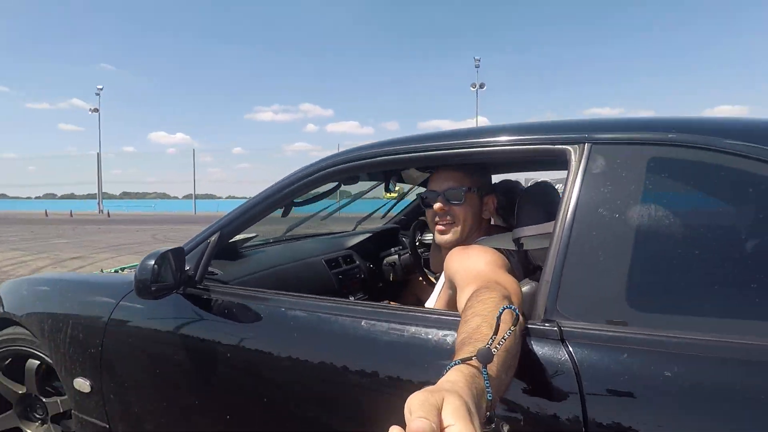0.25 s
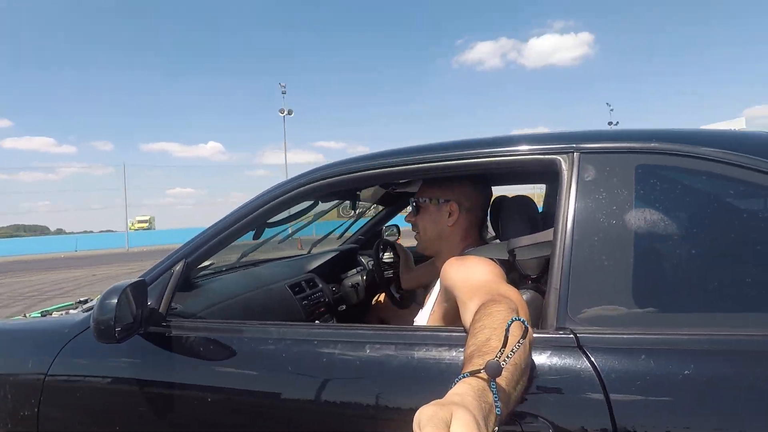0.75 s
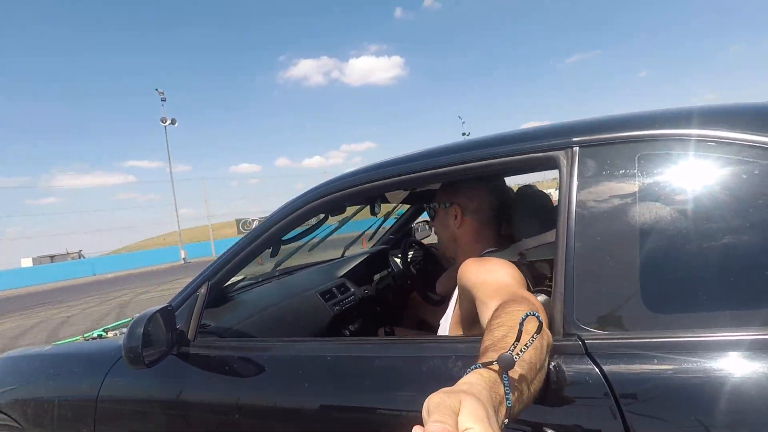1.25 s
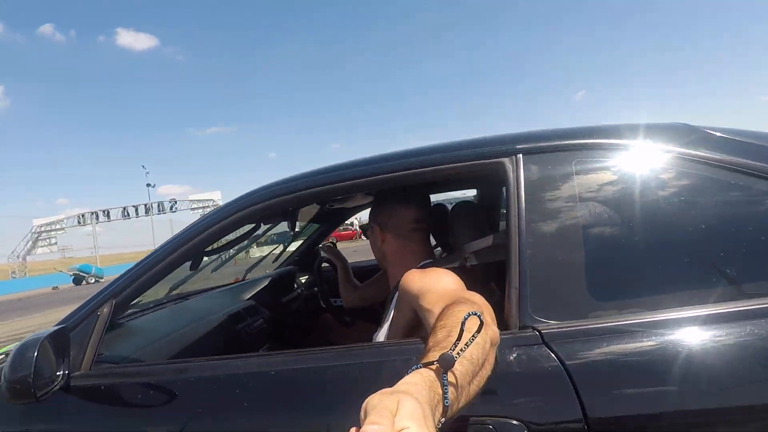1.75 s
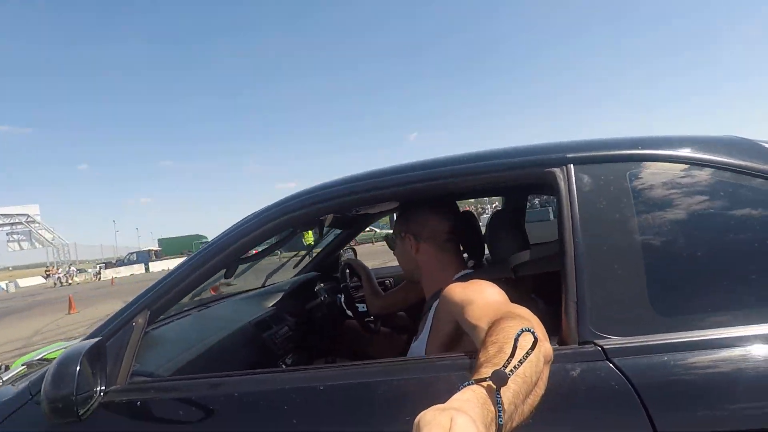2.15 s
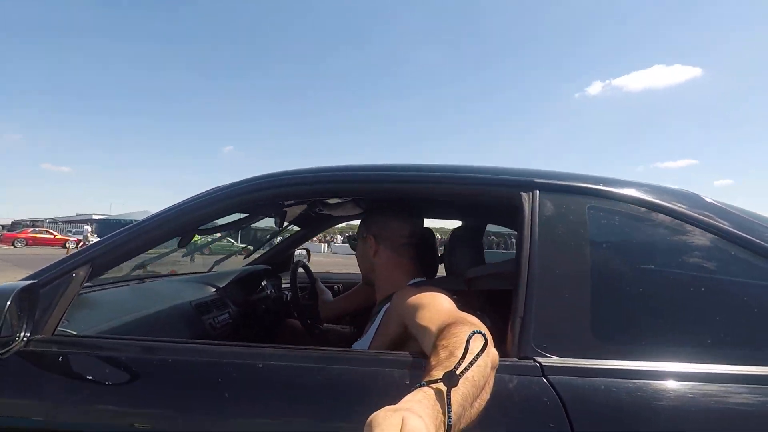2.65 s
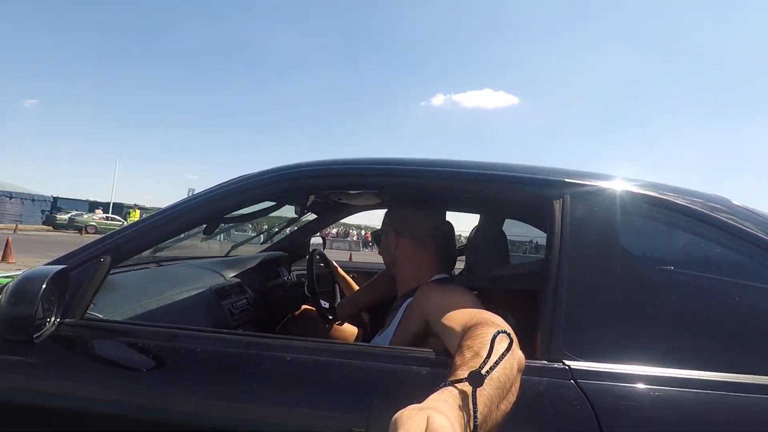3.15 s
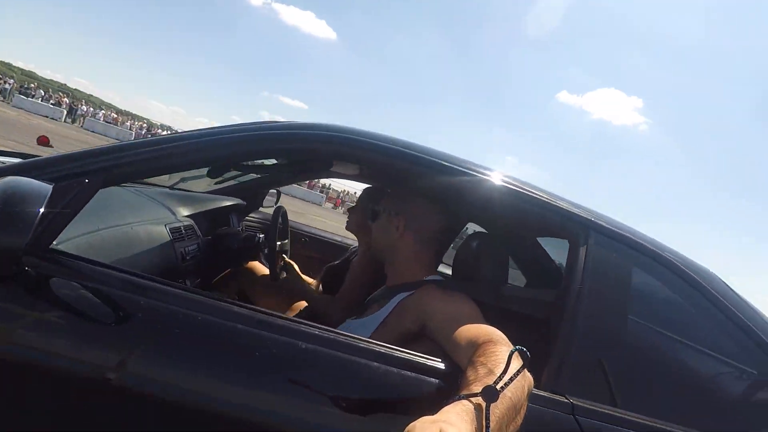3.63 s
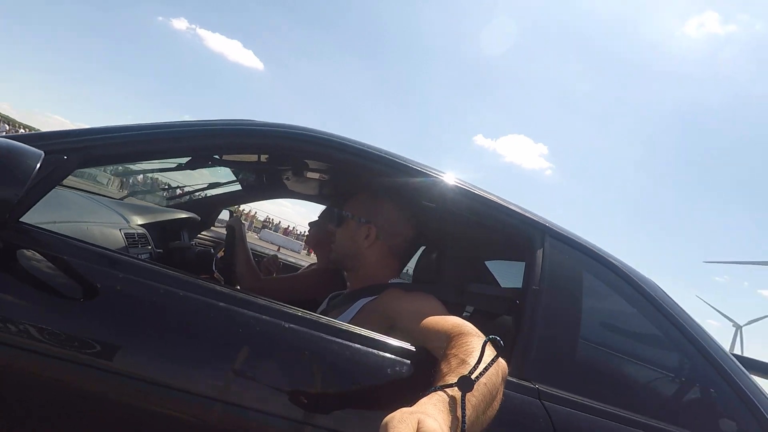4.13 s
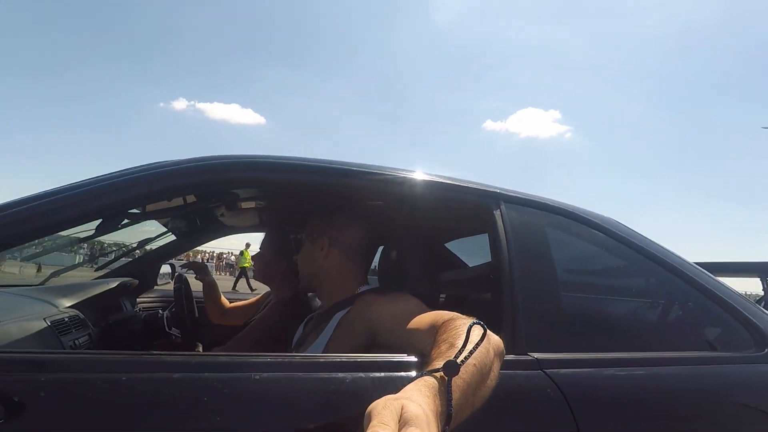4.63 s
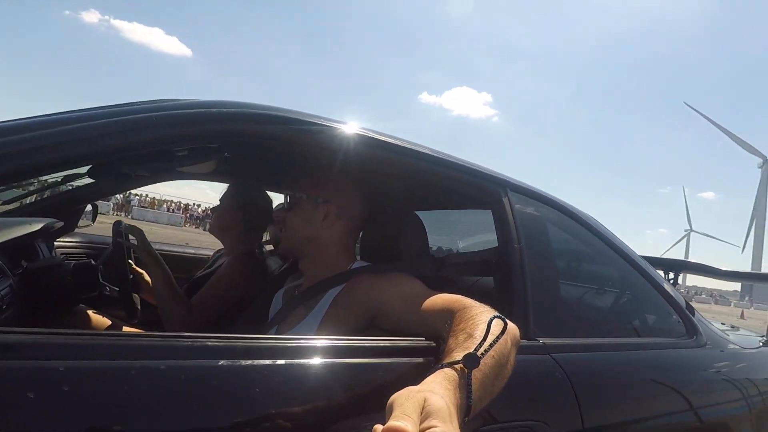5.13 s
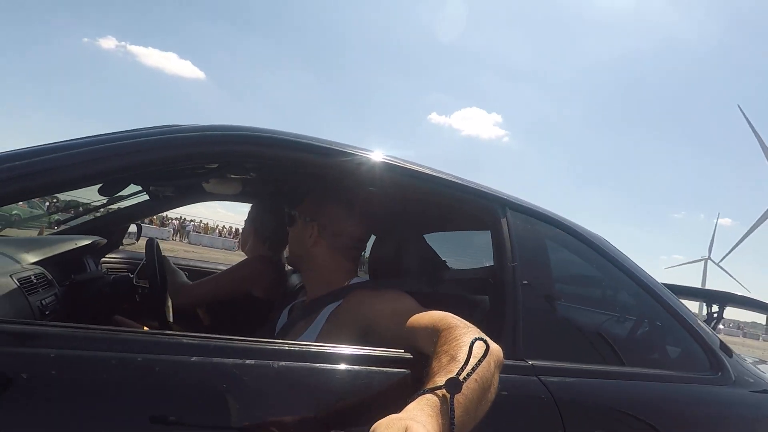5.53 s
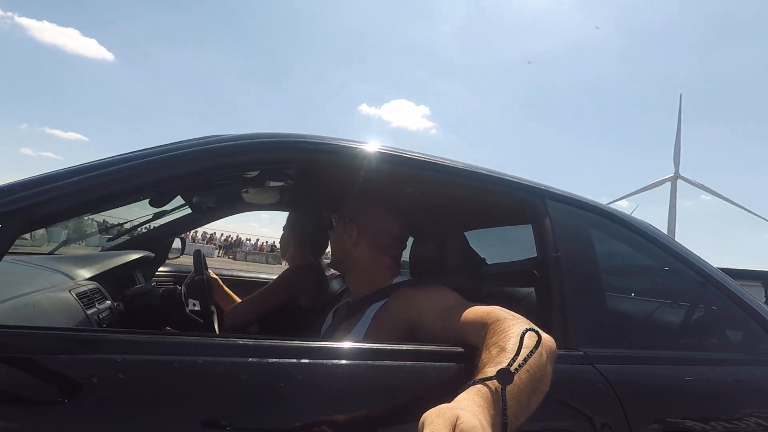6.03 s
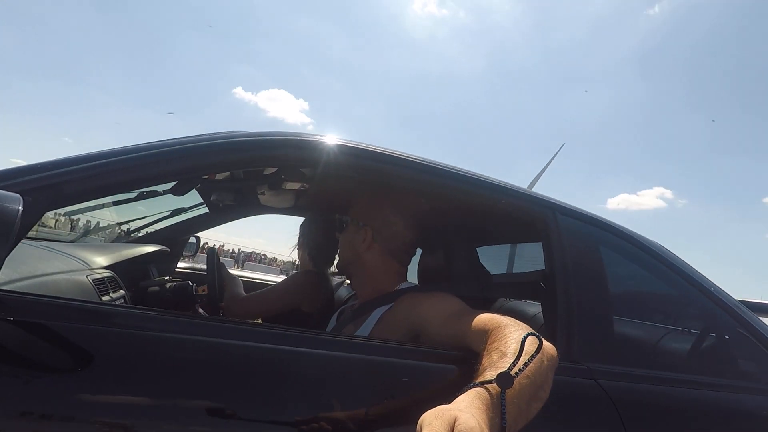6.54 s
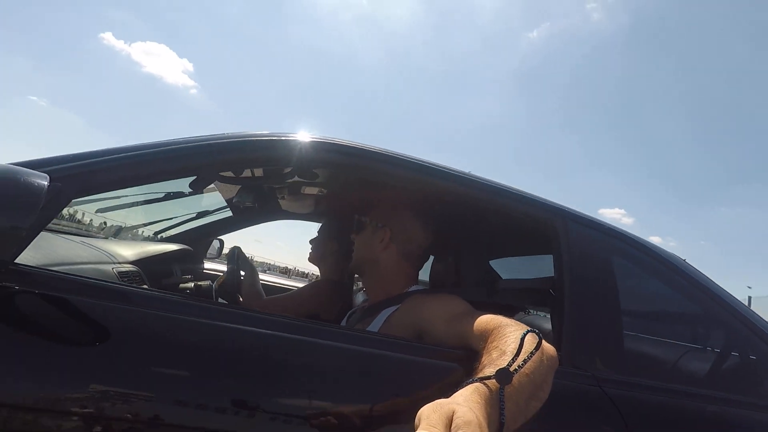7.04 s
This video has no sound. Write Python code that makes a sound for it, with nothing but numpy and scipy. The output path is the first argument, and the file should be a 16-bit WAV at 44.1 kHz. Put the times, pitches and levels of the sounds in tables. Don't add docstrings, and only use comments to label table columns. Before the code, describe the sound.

A car drifts with a loud, rough tyre squeal over booming exhaust and wind, then the squeal stops, revs sink, misfire and recover amid grit.

```python
import sys
import numpy as np
from scipy import signal
from scipy.fft import rfft, irfft
from scipy.io import wavfile
from scipy.ndimage import uniform_filter1d

SR = 44100
rng = np.random.default_rng(int(sys.argv[2]) if len(sys.argv) > 2 else 0)


def to_wav(s):
    ch = np.atleast_2d(s).T
    pcm = np.round(np.clip(ch, -1, 1) * 32767)
    wavfile.write(sys.argv[1], SR, pcm.astype(np.int16))


def ratio(d):
    e = np.asarray(d, float) / 20
    return 10 ** e


N = 321048

# t/s, firing f/Hz, boom level/dB, throttle [0-1]
REVS = [(0.0, 148, -15, 0.6), (0.235, 109.8, -12.5, 0.52), (0.33, 127.2, -10, 0.47),
        (0.55, 133, -12.5, 0.38), (1.19, 170, -13, 1), (1.32, 170, -20.5, .85), (2.0, 171, -19.5, 0.9),
        (3.5, 160, -21, 0.71), (3.63, 149.6, -23.5, 0.4), (3.85, 114, -11.5, 0.43), (4.14, 96.9, -10, 0),
        (4.76, 93.3, -9, 0), (5.45, 82.07, -9, 0.02), (5.79, 64, -13, 0.56), (5.83, 122.5, -21.5, 0.53),
        (6.42, 78.5, -18, 0.58), (6.93, 88.6, -14, 0.86), (7.28, 90, -12, 0.1)]
# t/s, level/dB
SCUFFING = [(0, -69), (.9, -50), (3.5, -50), (4.5, -58.5), (5.0, -67.5), (5.35, -58.5), (6.15, -76),
            (6.85, -55), (7.28, -58)]


def rms_one(x):
    return x / np.sqrt(np.mean(x ** 2) + 1e-20)


def in_time(rows):
    s, *columns = np.transpose(rows)
    return [np.interp(np.arange(N) / SR, s, c) for c in columns]


def at_hz(points, hz):
    spectrum_hz, spectrum_db = np.array(points).T
    return np.interp(np.log(hz), np.log(spectrum_hz), spectrum_db)


def drift(rate_hz):
    r = np.exp(-20 * np.pi * rate_hz / SR)
    noise = rng.standard_normal(N // 10 + 2002)
    slow = signal.lfilter([1], [1, -2 * r, r * r], noise)[2000:]
    return np.interp(np.arange(N) / 10, np.arange(len(slow)), rms_one(slow))


def phase_of(hz):
    return 2 * np.pi * np.cumsum(hz) / SR


def bump(s, length_s):
    return np.exp(-((np.arange(N) / SR - s) / length_s) ** 2 * 2)


def bumps_db(events):
    return sum(db * bump(s, length_s) for s, length_s, db in events)


def kick(s, recovery_s):
    late_s = np.maximum(np.arange(N) / SR - s, 0)
    return np.minimum(late_s / 0.01984, 1) * np.exp(-late_s / recovery_s)


def while_on(rows):
    gate = np.interp(np.arange(N) / SR, [rows[0][0], rows[-1][0]], [1, 1], 0, 0)
    return uniform_filter1d(gate, size=800, mode="nearest")


def band(x, order, low_hz, high_hz):
    return signal.sosfilt(signal.butter(order, [low_hz, high_hz], "band", fs=SR, output="sos"), x)


def coloured(spectrum, patchy_db, rate_hz, ref_hz):
    hz = np.maximum(np.fft.rfftfreq(N, 1 / SR), 1)
    bins = rfft(rng.standard_normal(N)) * ratio(at_hz(spectrum, hz))
    inside = (hz > ref_hz[0]) & (hz < ref_hz[1])
    bins /= np.sqrt(2 * np.sum(np.abs(bins[inside]) ** 2)) / N
    octave, together = np.log2(hz / 20), drift(rate_hz)
    total = np.zeros(N)
    for k in range(-1, 11):
        if spectrum[0][0] / 2 < 20 * 2 ** k < spectrum[-1][0] * 2:
            part = irfft(bins * np.clip(1 - np.abs(octave - k), 0, 1), N)
            total += part * ratio(patchy_db * (0.47 * together + 0.69 * drift(rate_hz)))
    return total


def engine():
    # multiple of firing f, level/dB
    order_db = [(1.5, -2.5), (2.5, -8.5), (3, -3), (3.5, -3), (4, 1.5)]
    # f/Hz, level/dB
    pipe_db = [(40, 2), (130, 11), (200, -11), (330, -9.5), (430, -8.5), (800, -10)]
    # t/s, length/s, boom dip/dB, thud level/dB
    misses = [(.53, .04, -6, -25), (1.26, .04, -6, -25), (4.447, .016, -13, -13), (4.51, .025, -5, -25),
              (4.663, .016, -11, -22), (4.72, .016, -15, -15), (5.07, .02, -3, -28), (5.81, .02, -8, -20)]
    # t/s, recovery/s, share of revs lost [0-1], boom gain/dB
    bogs = [
        (.56, .3, .13, 3.5),
        (1.359, .14, .17, 8),
        (1.852, 0.0607, .06, -9),
        (5.97, .15, 0.0, 7),
    ]
    # t/s, recovery/s, gain/dB
    clutch_slip = (5.8, 0.18, 22)
    second_db, three_quarter_db, lumpy_db = -32.5, -7, 2
    half_shut_db, half_open_db, half_full_throttle = -45, -22.5, 0.83
    upper_shut_db, upper_open_db = -52.5, -25.5

    hz, first_db, throttle = in_time(REVS)
    hz = hz * (1 - sum(share * kick(s, recovery_s) for s, recovery_s, share, db in bogs))
    first_db = first_db + sum(db * kick(s, recovery_s) for s, recovery_s, share, db in bogs)
    half_db = np.interp(throttle ** 2, [0, half_full_throttle ** 2], [half_shut_db, half_open_db])
    slip_s, slip_recovery_s, slip_db = clutch_slip
    half_db = half_db + slip_db * kick(slip_s, slip_recovery_s) + lumpy_db * drift(5)
    upper_db = np.interp(throttle ** 2, [0, 1], [upper_shut_db, upper_open_db])
    phase = phase_of(hz * (1 + 0.01196 * drift(25.5)))

    lines = [(1, first_db),
             (2, first_db + second_db + lumpy_db * drift(3.1)),
             (1 / 2, half_db),
             (3 / 4, half_db + three_quarter_db + lumpy_db * drift(18))]
    lines += [(k, upper_db + db + at_hz(pipe_db, k * hz)) for k, db in order_db]
    boom = np.zeros(N)
    for k, db in lines:
        boom += np.sqrt(2) * ratio(db + 0.35 * drift(18)) * np.sin(k * phase + rng.uniform(0, 2 * np.pi))
    gaps = ratio(sum(dip_db * bump(s, length_s) for s, length_s, dip_db, thud_db in misses))
    thuds = sum(-ratio(thud_db) * bump(s, 0.6 * length_s) for s, length_s, dip_db, thud_db in misses)
    return boom * gaps + signal.sosfilt(signal.butter(2, 25, "high", fs=SR, output="sos"), thuds)


def tyres():
    # t/s, slip f/Hz, squeal level/dB
    slip = [(0.0, 1083, -13.5), (0.033, 1075, -13), (0.047, 965.1, -11.5), (0.4, 998.3, -12.5),
            (0.465, 1040, -13.5), (0.51, 985, -11.5), (0.6, 946.8, -12), (0.77, 1021, -14),
            (1.15, 1087, -14), (1.5, 1051, -13), (2.66, 1087, -13), (3.3, 1046, -13.5), (3.52, 1066, -15),
            (3.75, 981, -12), (3.9, 948, -12), (4.01, 953, -12.5), (4.07, 975, -23.5), (4.09, 970, -39)]
    # t/s, roughness [0-1]
    roughness = [(0, .8), (.7, .76), (1.1, .97), (3.5, .97), (3.75, .75), (4.0, .72), (4.1, .9)]
    # multiple of slip f, level/dB
    overtone_db = [(2, 10), (3, 0.5), (4, -13.5), (5, -23), (6, -29.5)]
    # f/Hz, level/dB per Hz
    scrub_colour = [(250, -9.5), (500, 0.5), (800, 2.5), (1250, 22.5), (1700, 16.5), (2300, 19.5),
                    (3500, 11), (4400, 12.5), (5100, -0.5), (6900, 1.5), (10000, -28), (11500, -49),
                    (15000, -65.5)]
    # t/s, length/s, level/dB
    catches = [(.035, .012, -10), (.47, .02, -6), (1.015, .008, -12), (1.88, .012, -8), (2.195, .012, -14),
               (2.87, .01, -10), (4.045, .02, -9)]
    # t/s, length/s, level/dB
    surges = [(0.124, 0.037, 5.5), (0.424, 0.14, 4.5), (0.6, 0.18, -3), (1.273, 0.022, 6),
              (1.41, 0.19, -10.5), (1.96, 0.044, -10.5), (2.61, 0.031, 3.5), (2.692, 0.02946, -11.5),
              (2.9, 0.12, 2.5), (3.235, 0.052, 5.5), (3.498, 0.041, 2.5), (3.82, .04, -5), (3.9, .04, 2.5)]
    # scrub fade t/s, scrub fade/(dB/s), overtone fade t/s, overtone fade/(dB/s)
    grip_return = (3.63, 43, 3.89, 120)
    # f/Hz, width/Hz, level/dB
    ground_notch = (2720, 220, -11)

    (hz, main_db), (rough,), t = in_time(slip), in_time(roughness), np.arange(N) / SR
    scrub_s, scrub_fade, tone_s, tone_fade = grip_return
    catch_db = bumps_db(catches)
    bite_db = 0.8 * drift(14) + catch_db + bumps_db(surges)
    over_db = -27.5 + 10.5 * (1 - rough) + bite_db - tone_fade * np.maximum(t - tone_s, 0)
    hiss_db = -42.5 + 10 * (rough - 1) + 0.49 * bite_db - scrub_fade * np.maximum(t - scrub_s, 0)

    phase = phase_of(hz * (1 + rough * (0.013 * drift(50) + 0.019 * drift(250))))
    main = np.exp(1j * phase) * ratio(rough * (6.2 * drift(60) + 2.6 * drift(130)))
    overtones = np.zeros(N)
    for k, db in overtone_db:
        steady_tilt_db = 9 * (1 - rough) * (k - 2.5)
        overtones += ratio(db + steady_tilt_db) * np.sin(k * phase)
    overtones *= ratio(2 * drift(50))
    for detune in [-0.06, 0.02, 0.06, 0.13]:
        phase = phase_of(hz * (1 + rough ** 2 * (detune + 0.022 * drift(40) + 0.026 * drift(250))))
        grip = rough ** 2 * ratio(3.0 * drift(60))
        main = main + ratio(-9.5) * grip * np.exp(1j * phase)
        overtones += ratio(-4) * grip * sum(ratio(db) * np.sin(k * phase) for k, db in overtone_db)

    main = (main / (1 + np.abs(main) ** 2 / 0.6) ** 0.35).imag
    main *= ratio(catch_db)
    overtones /= np.sqrt(uniform_filter1d(overtones ** 2, size=8000))
    scrub = coloured(scrub_colour, 3.2, 53, ref_hz=(4700, 9000))
    slide = ratio(main_db) * rms_one(main) * while_on(slip) + ratio(over_db) * overtones + ratio(hiss_db) * scrub
    centre_hz, width_hz, depth_db = ground_notch
    offset = (np.fft.rfftfreq(N, 1 / SR) - centre_hz) / (width_hz / 2)
    return irfft(rfft(slide) * ratio(depth_db / (1 + offset ** 2)), N)


def air():
    # t/s, level/dB
    airspeed = [(0, -54.5), (.45, -46), (1.05, -42), (2.5, -44.5), (3.2, -52.5), (3.7, -44), (4.5, -43),
                (5.0, -40.5), (5.7, -45), (6.2, -44.5), (6.8, -37), (7.28, -37.5)]
    # f/Hz, level/dB per Hz
    buffet_colour = [(15, 0.5), (30, 7), (60, 13), (120, 14), (170, -0.5), (260, -24), (400, -44.5)]
    rumble_colour = [(100, -29.5), (150, 6), (210, 4.5), (250, -6.5), (300, -42)]
    road_colour = [(150, -29.5), (250, -8), (344, -9), (700, -13.5), (753, -12.5), (1340, -17),
                   (1510, -19.5), (8000, -39.5), (10400, -75.5), (17600, -120)]
    hiss_colour = [(1500, -10), (4000, 3.5), (6700, 2.5), (7600, -5.5), (8500, -3), (10000, -13),
                   (11500, -26), (15000, -67)]
    # t/s, length/s, level/dB
    gusts = [(.7, 0.18, -4), (2.4, 0.16, 5), (2.85, .1, -5), (3.115, .1, 9), (3.801, 0.13, -8),
             (4.697, 0.067, 10.5), (5.8, .1, 4), (6.2, 0.084, 4.5), (6.95, .2, 5)]
    # t/s, length/s, level/dB
    shudders = [
        (0.045, 0.29, 11.5),
        (4.72, 0.16, 4.5),
        (7.183, 0.15, 22.5),
    ]
    # t/s, length/s, level/dB
    swells = [(4.18, 0.21, 4), (4.687, .1, 3), (4.5, .05, 2.5), (4.868, .06, 3), (5.25, .1, -2),
              (6.022, .12, 2)]

    (road_db,), (hiss_db,), throttle = in_time(airspeed), in_time(SCUFFING), in_time(REVS)[2]
    buffet_db = -32 + 0.15 * (road_db - road_db.mean()) + 2.5 * drift(1.9) + bumps_db(gusts)
    rumble_db = np.interp(throttle, [0, 1], [-42, -23.5]) + bumps_db(shudders)
    buffet = ratio(buffet_db - 0.5) * coloured(buffet_colour, 1.8, 10, ref_hz=(20, 55))
    rumble = ratio(rumble_db - 3.5) * coloured(rumble_colour, 3.5, 7.1, ref_hz=(185, 240))
    road = ratio(road_db - 1.5 + bumps_db(swells)) * coloured(road_colour, 1.78, 20, ref_hz=(280, 400))
    hiss = ratio(hiss_db - 6.0) * coloured(hiss_colour, 3.0, 14, ref_hz=(7500, 9500))
    return buffet + rumble + road + hiss


def low_squeal():
    # t/s, f/Hz, peak level/dB, decay/(dB/s)
    yelps = [(.03, 770, -17, 150), (.12, 724, -26, 149), (.32, 792, -32, 58), (.45, 730, -25.5, 145),
             (.54, 700, -23, 118), (.73, 654, -25, 78), (3.539, 773, -22, 118.5), (3.62, 700, -24, 118),
             (3.72, 690, -26, 100)]
    rise_db_per_s = 600.5
    out, t = np.zeros(N), np.arange(N) / SR
    wobble = 1 + 0.021 * drift(40) + 0.043 * drift(190)
    flicker_db = 5.6 * drift(30)
    for s, hz, db, decay_db_per_s in yelps:
        shape_db = np.minimum(rise_db_per_s * (t - s), decay_db_per_s * (s - t))
        out += ratio(db - 5.5 + flicker_db + shape_db) * np.sin(phase_of(hz * wobble))
    return out


def brake():
    # t/s, peak level/dB, f/Hz, length/s
    pad_chirps = [(0.296, -28.5, 6580, 0.063), (3.155, -26, 6610, 0.068), (3.766, -33, 6960, 0.04),
                  (4.284, -26, 6700, 0.035), (4.32, -37, 6730, 0.029), (4.4036, -18.5, 6610, 0.057),
                  (4.617, -41, 6800, 0.036)]
    drag_hz, drag_width_hz, octave_width_hz, octave_end_s = 6640, 70, 600, 2.35
    wobble = 1 + 0.016 * drift(150)
    chirps = np.zeros(N)
    for s, db, hz, length_s in pad_chirps:
        chirps += ratio(db - 6.0) * bump(s + length_s / 2, length_s / 2) * np.sin(phase_of(hz * wobble))
    scuff_db, = in_time(SCUFFING)
    drag_db = -50 + scuff_db - scuff_db.max()
    drag = np.sin(phase_of(drag_hz + drag_width_hz * drift(200))) * ratio(2.2 * drift(20))
    octave = np.sin(phase_of(2 * drag_hz + octave_width_hz * drift(900))) * ratio(-19 + 3.0 * drift(8))
    return chirps + ratio(drag_db - 1) * (drag + octave * while_on([(0,), (octave_end_s,)]))


def roar():
    # t/s, level/dB
    roar_db = [(1.0, -39.5), (1.22, -27), (1.55, -37)]
    # f/Hz, level/dB per Hz
    roar_colour = [(300, -46), (420, -6), (600, -12), (850, -11.5), (1100, -25)]
    gas = coloured(roar_colour, 1.6, 25, ref_hz=(350, 900))
    return while_on(roar_db) * ratio(in_time(roar_db)[0]) * gas


def valve():
    # start t/s, end t/s, puff rate/Hz, level/dB
    flutter = (3.4, 4.5, 11, -62)
    start_s, end_s, rate_hz, level_db = flutter
    puffs = np.maximum(np.sin(2 * np.pi * rate_hz * (np.arange(N) / SR - 3.99)), 0) ** 2
    hiss = band(rng.standard_normal(N), 2, 6800, 9800)
    return ratio(level_db) * bump((start_s + end_s) / 2, (end_s - start_s) / 2) * puffs * rms_one(hiss)


def grit():
    # t/s, peak level/dB
    sprays = [(4.641, -46), (4.856, -53), (6.148, -32.5), (6.392, -29), (6.44, -35), (6.509, -29.5),
              (6.627, -23.5), (6.695, -30.5), (6.781, -23), (6.854, -21), (6.919, -28), (6.966, -27.5),
              (7.028, -32), (7.098, -37), (7.217, -33.5)]
    # t/s, peak level/dB
    ticks = [(5.3637, -23.5), (5.7808, -33), (5.9968, -23.5), (6.0252, -38.5), (6.1804, -28),
             (6.3145, -26.5), (6.568, -31), (6.8394, -22)]
    # t/s, peak level/dB
    knocks = [
        (6.228, -8.5),
        (6.352, -17.5),
    ]
    # f/Hz, level/dB, t60/s
    panel_modes = [(1400, -8, 0.024), (2080, -7.5, 0.024), (2500, -7, 0.04), (3140, -7, .02),
                   (3962, -4, 0.016)]
    spray_hz, spray_s, tick_decay_s, knock_rise_s = 1270, 0.02, 0.0027, 0.00097

    out, t = np.zeros(N), np.arange(SR // 5) / SR
    for s, db in sprays:
        body = band(rng.standard_normal(len(t)), 1, 0.35 * spray_hz, 2.8 * spray_hz)
        burst = ratio(db - 6.5) * rms_one(body) * np.exp(-(t / spray_s - 1) ** 2 * 2)
        at = round((s - 0.25 * spray_s) * SR)
        out[at:at + len(t)] += burst[:N - at]
    for s, db in ticks:
        at = round(s * SR)
        click = np.gradient(rng.standard_normal(len(t)))
        out[at:at + len(t)] += ratio(db - 6.0) * click * np.exp(-t / tick_decay_s)
    for s, db in knocks:
        at = round(s * SR)
        rings = np.zeros(len(t))
        for hz, mode_db, t60_s in panel_modes:
            rings += ratio(mode_db - 60 * t / min(t60_s, 0.04)) * np.sin(2 * np.pi * hz * t)
        out[at:at + len(t)] += ratio(db - 9.0) * rings * np.minimum(t / knock_rise_s, 1)
    return signal.sosfilt(signal.butter(4, 6200, fs=SR, output="sos"), out)


def gear():
    # t/s, f/Hz, level/dB
    gear_hum = [(6.3, 119.6, -30), (6.47, 116.1, -21), (6.84, 131.1, -29.5), (6.95, 142.3, -26),
                (7.2, 145.9, -16.5), (7.28, 146.2, -15)]
    hz, level_db = in_time(gear_hum)
    hum = np.sin(phase_of(hz * (1 + 0.024 * drift(36))))
    return while_on(gear_hum) * np.sqrt(2) * ratio(level_db + 1.0 * drift(27)) * hum


def scene():
    car = engine() + roar() + valve() + gear() + brake()
    ground = tyres() + low_squeal() + grit()
    return (car + ground + air())[None]


def band_limit(x):
    return signal.sosfilt(signal.butter(12, 14400, fs=SR, output="sos"), x)


def record(dry):
    mix = 1.199 * np.tanh(dry / 1.09)
    return band_limit(mix)


dry = scene()
out = record(dry)
to_wav(out)
```